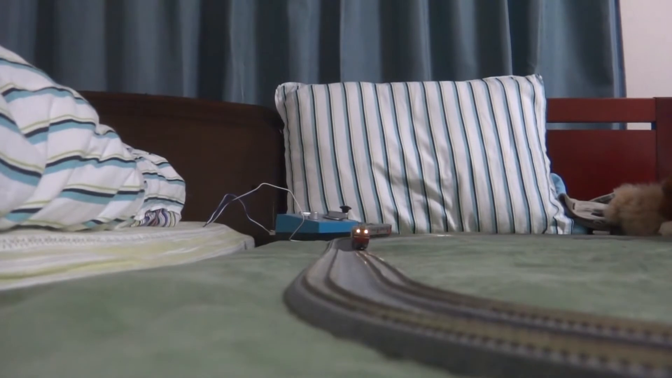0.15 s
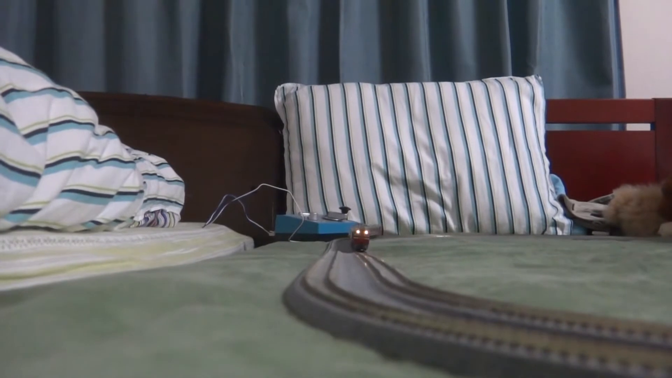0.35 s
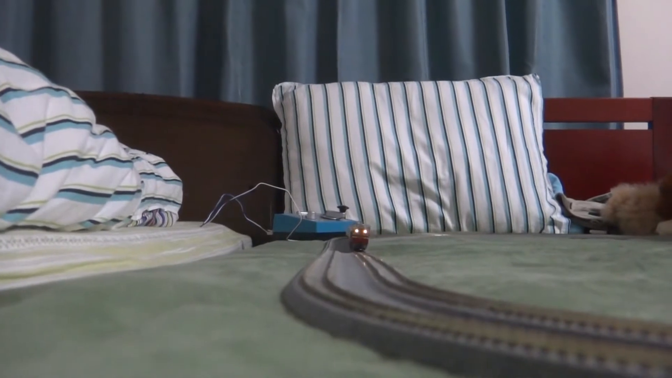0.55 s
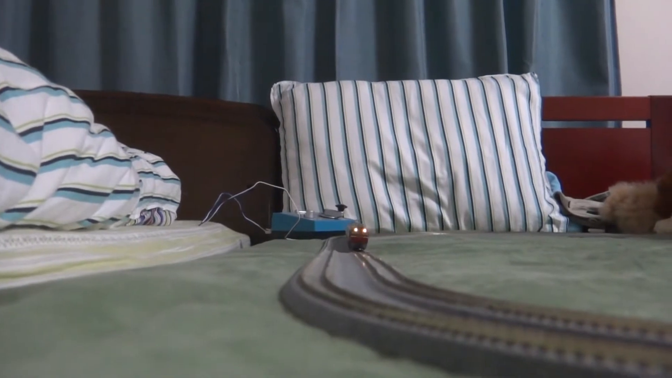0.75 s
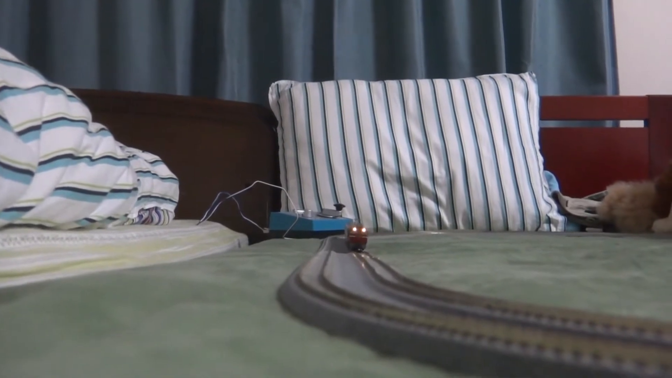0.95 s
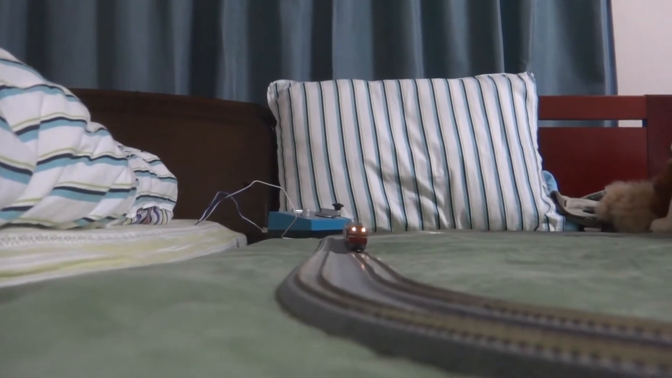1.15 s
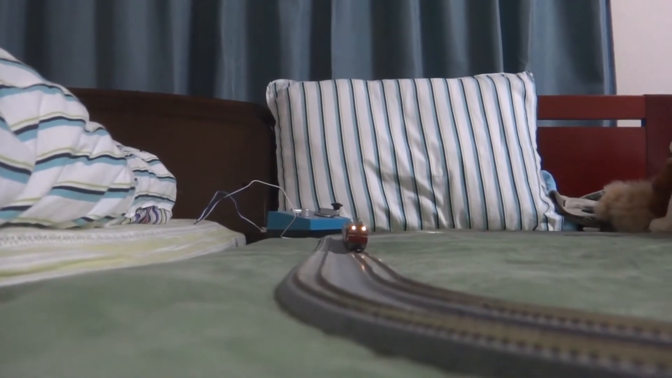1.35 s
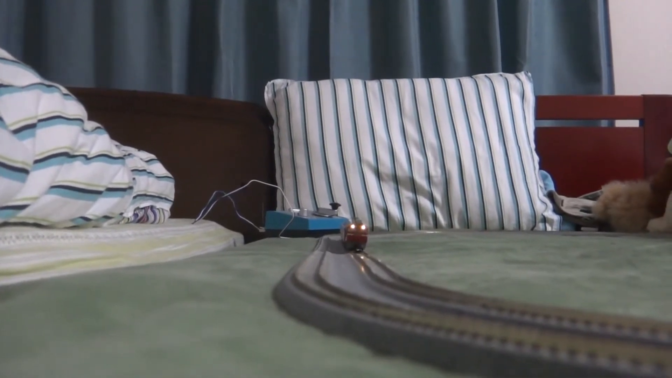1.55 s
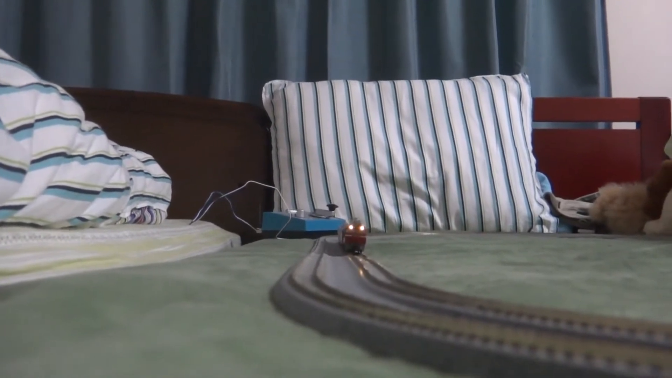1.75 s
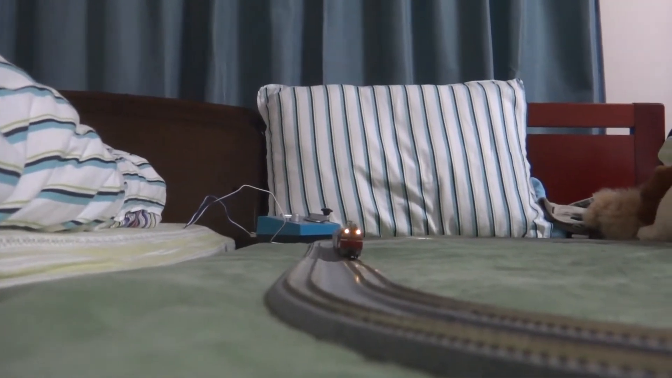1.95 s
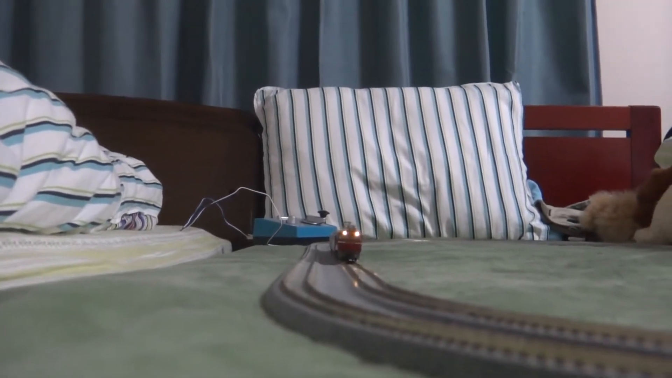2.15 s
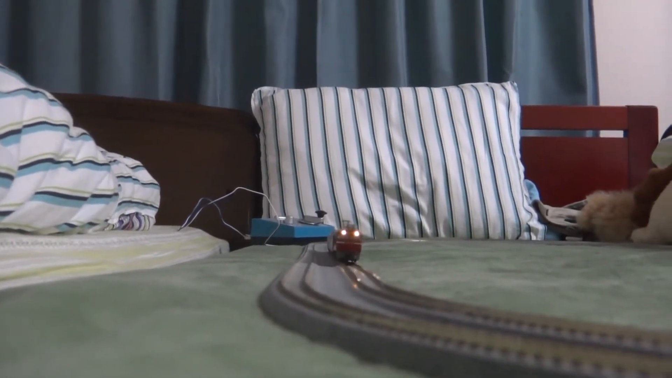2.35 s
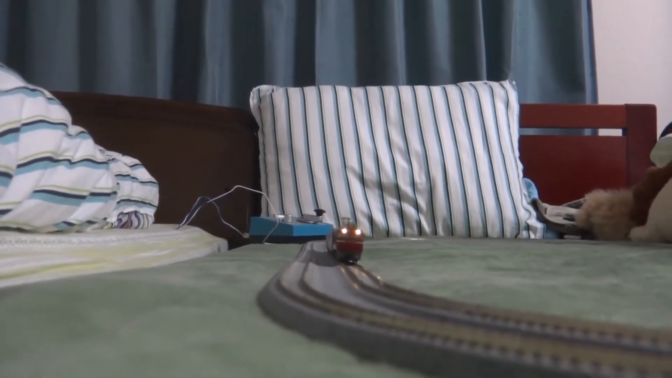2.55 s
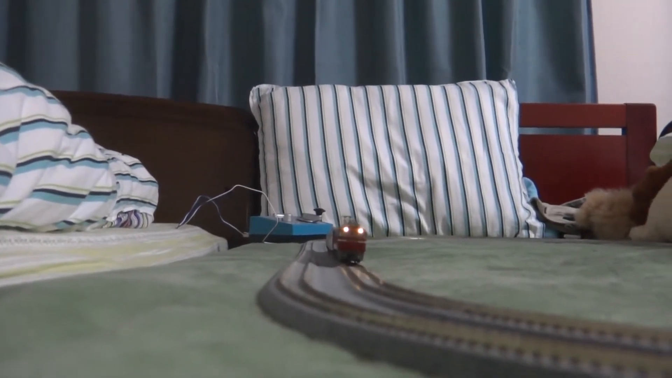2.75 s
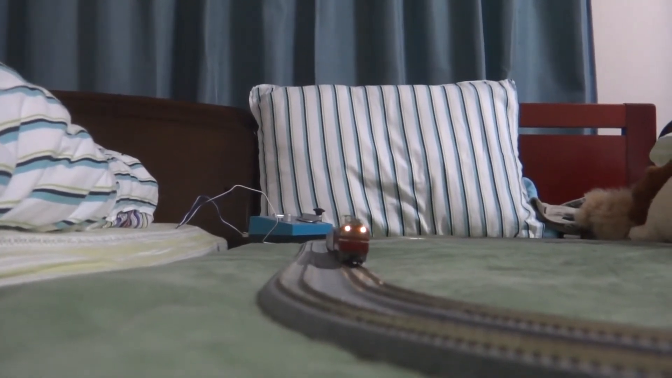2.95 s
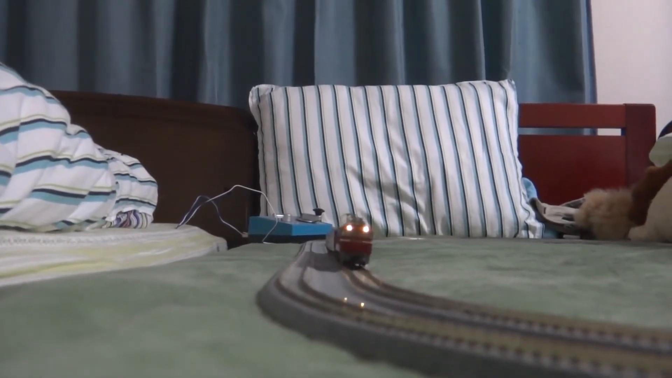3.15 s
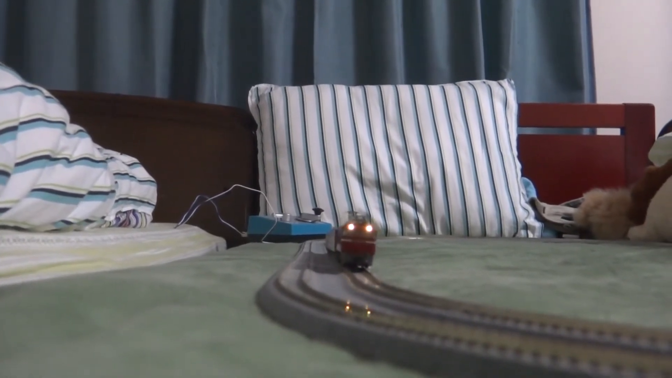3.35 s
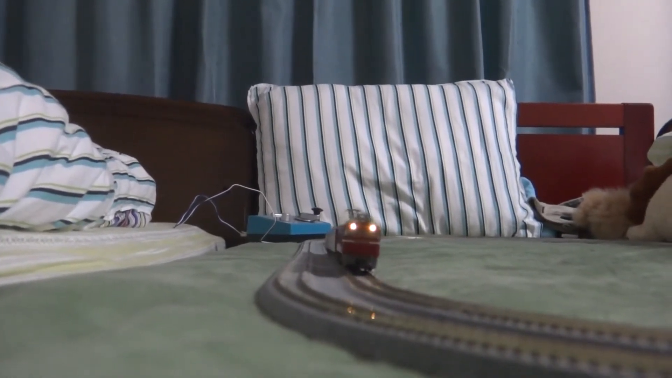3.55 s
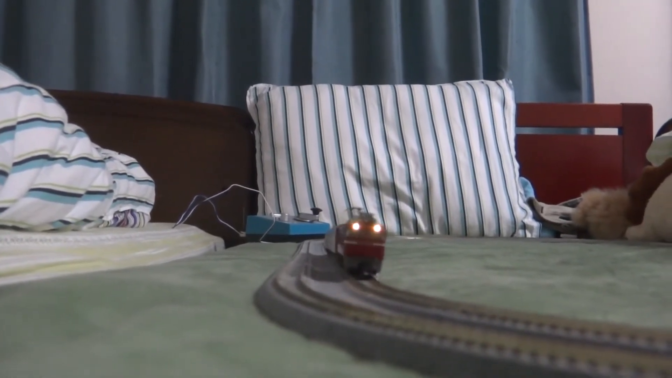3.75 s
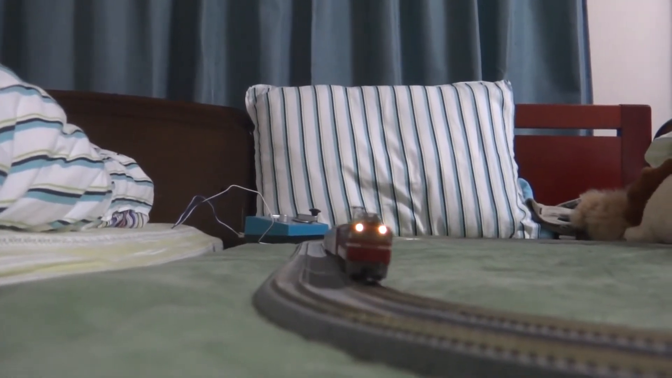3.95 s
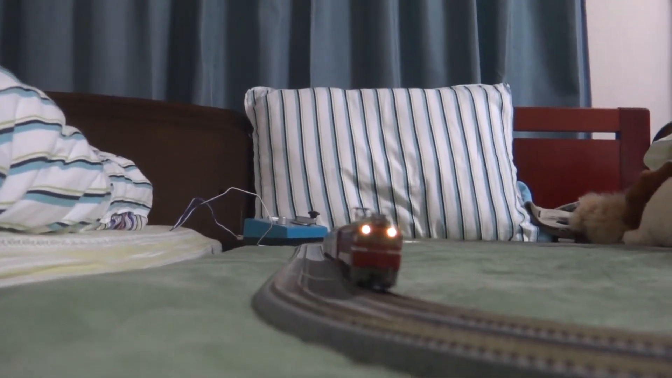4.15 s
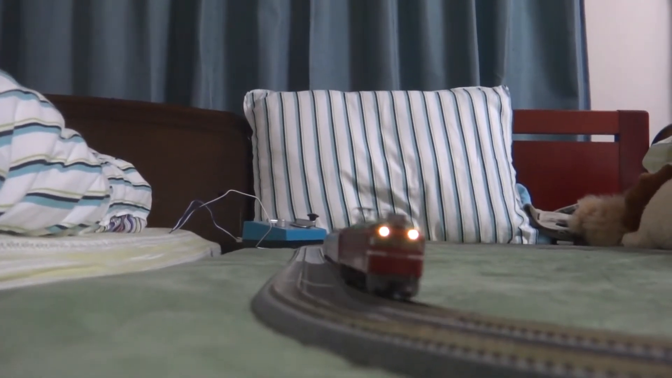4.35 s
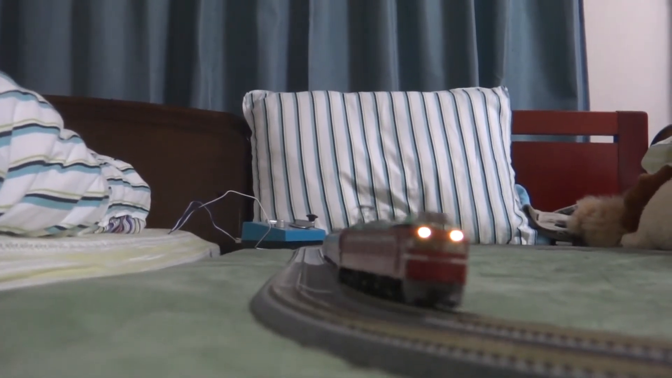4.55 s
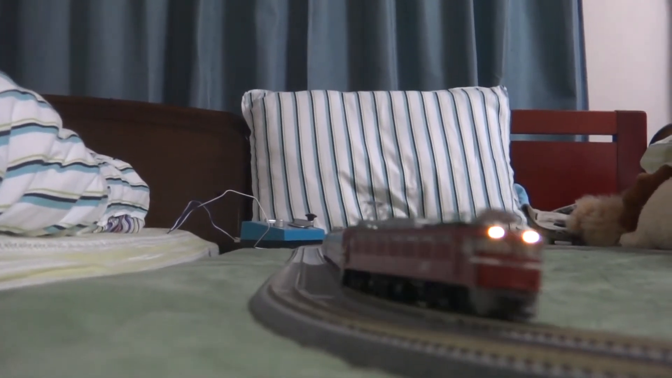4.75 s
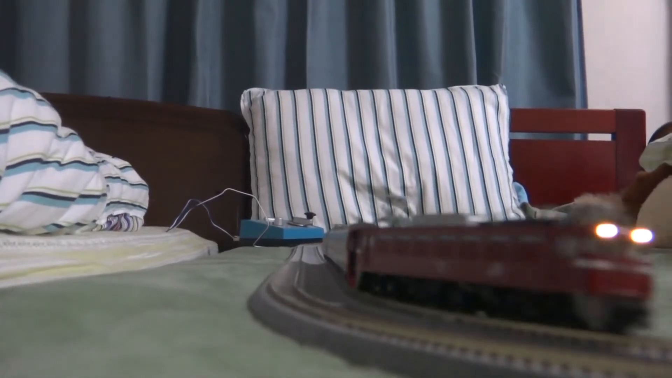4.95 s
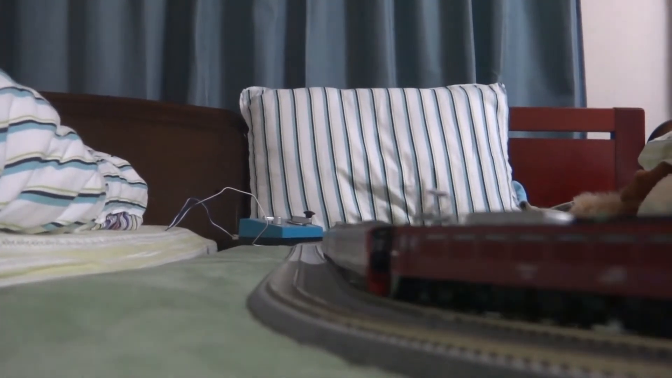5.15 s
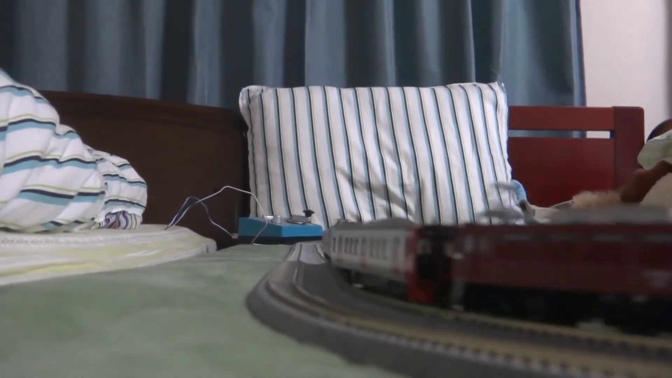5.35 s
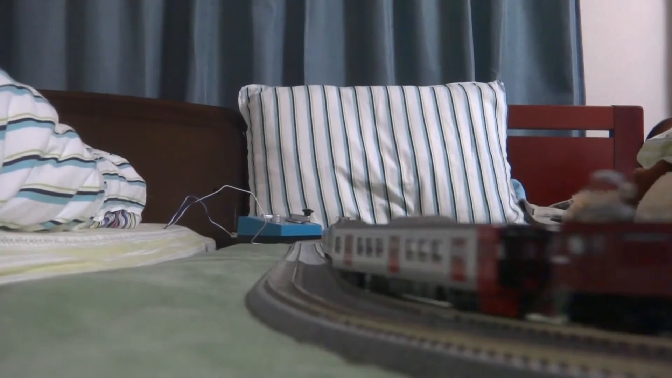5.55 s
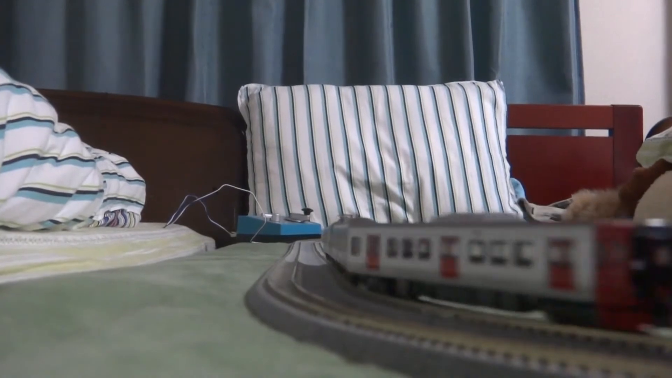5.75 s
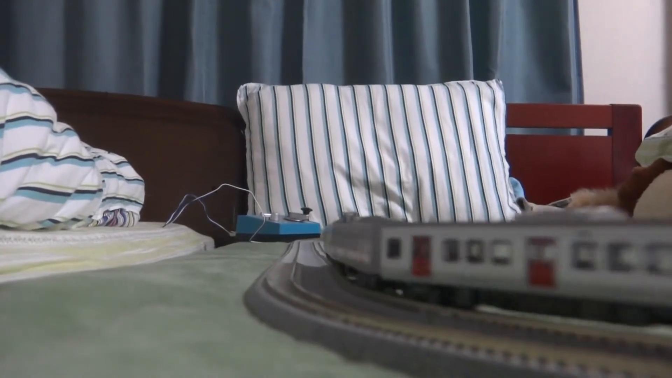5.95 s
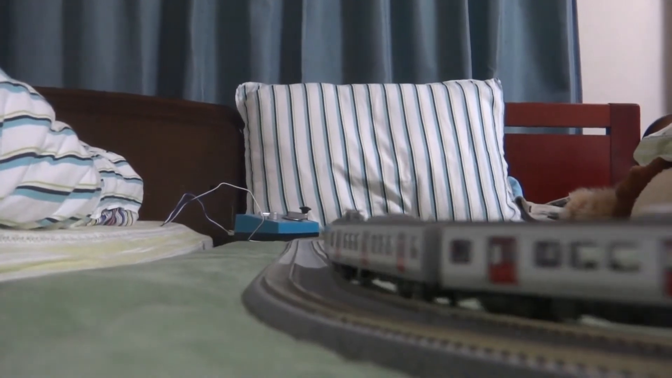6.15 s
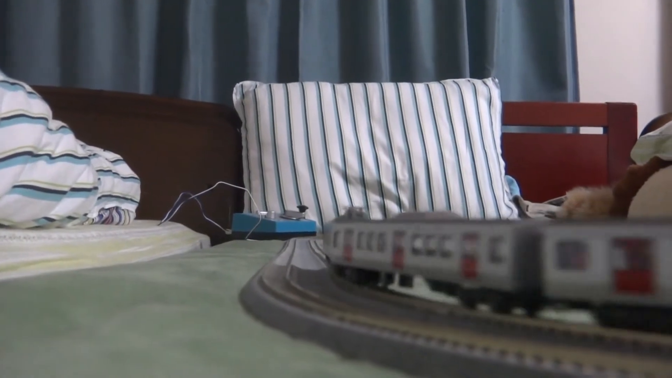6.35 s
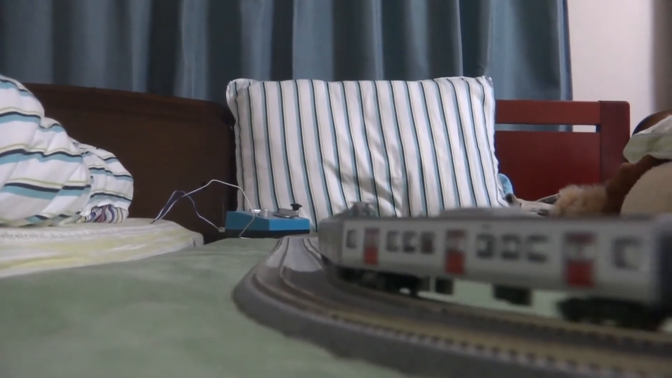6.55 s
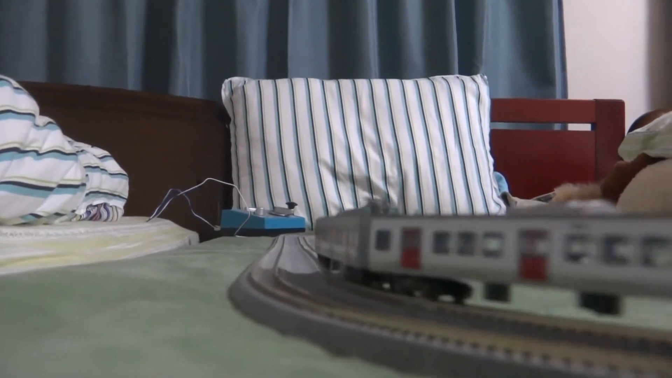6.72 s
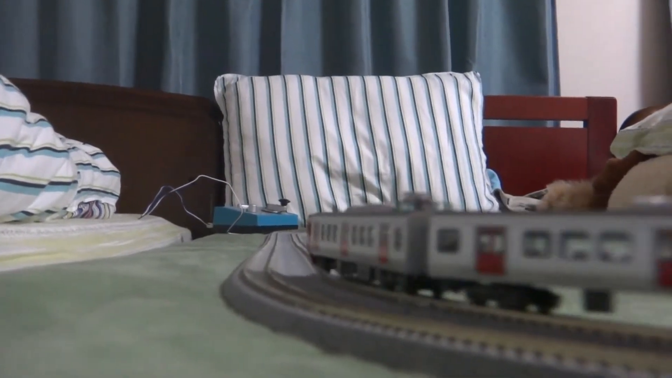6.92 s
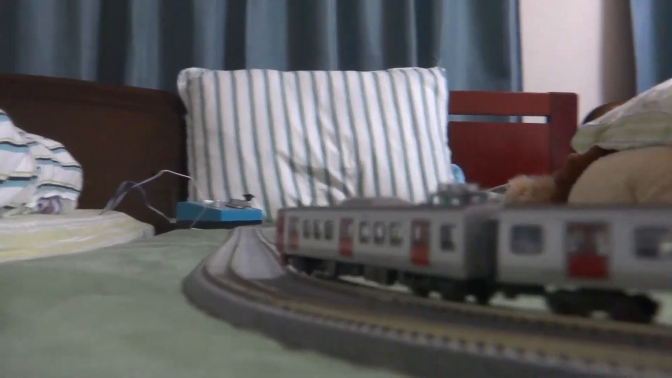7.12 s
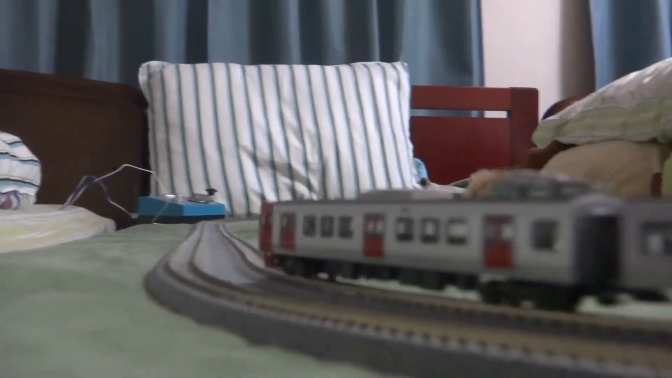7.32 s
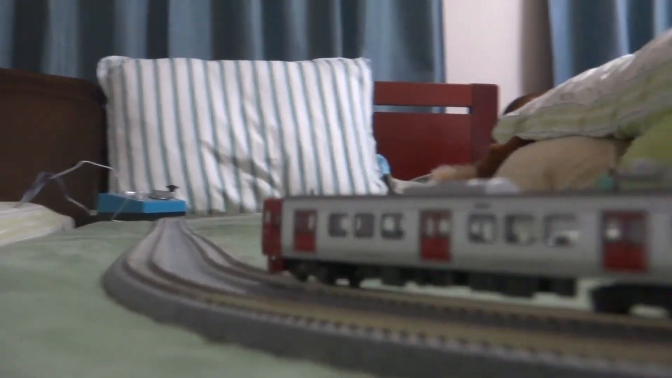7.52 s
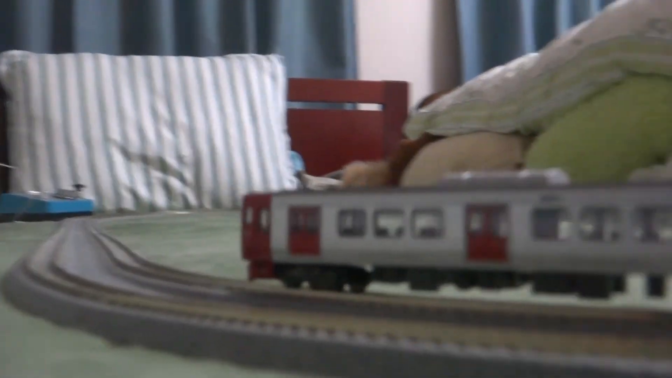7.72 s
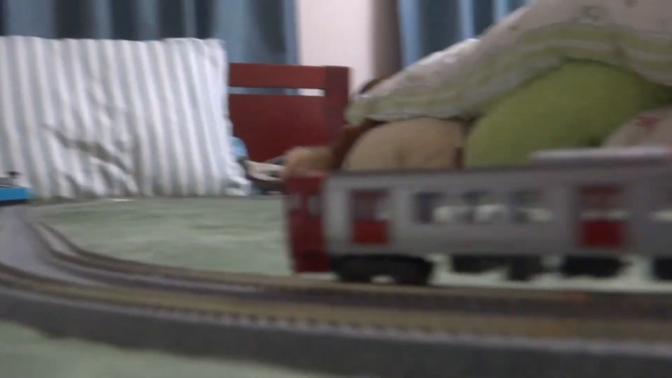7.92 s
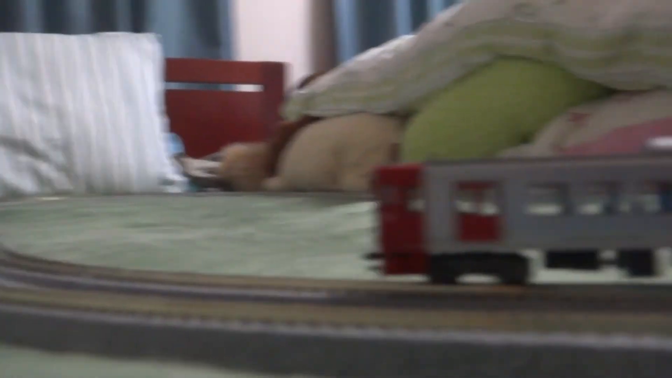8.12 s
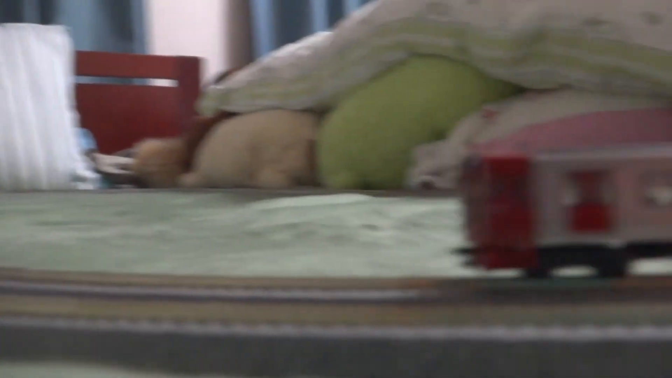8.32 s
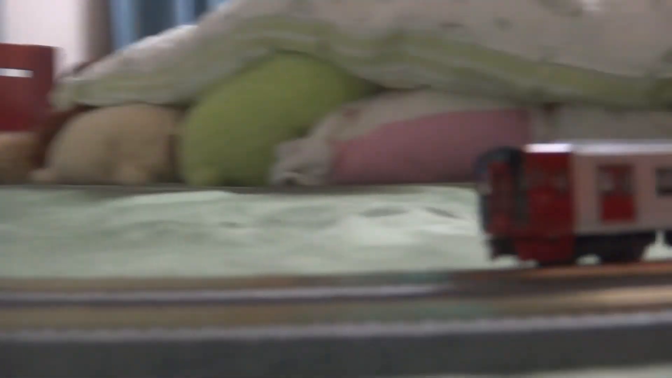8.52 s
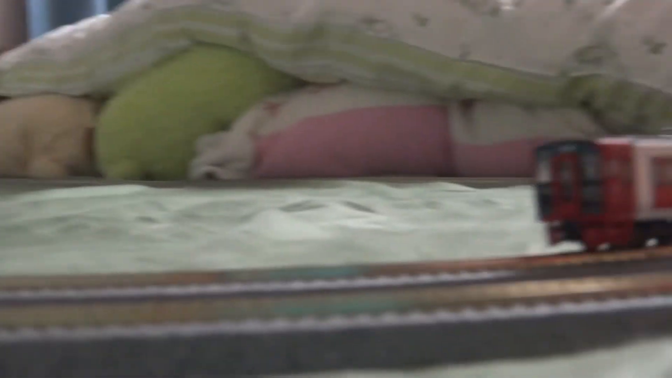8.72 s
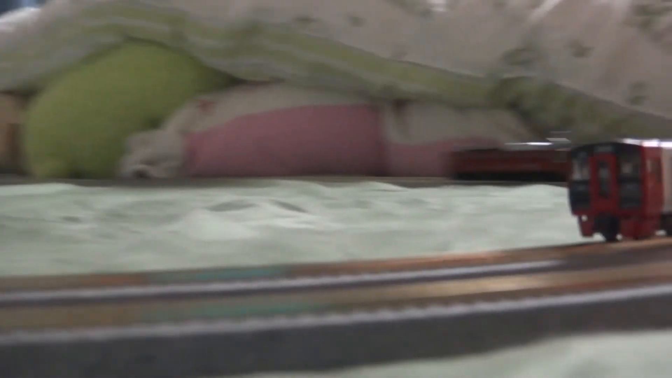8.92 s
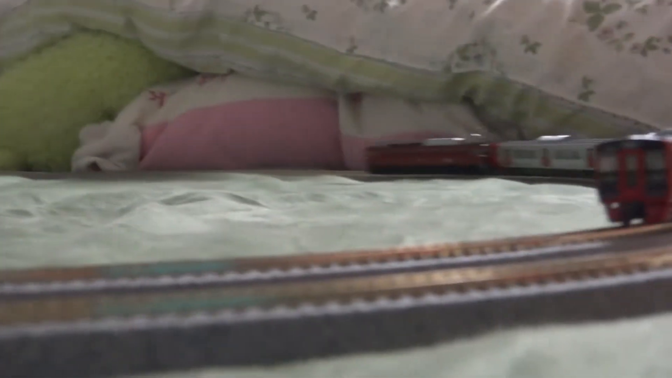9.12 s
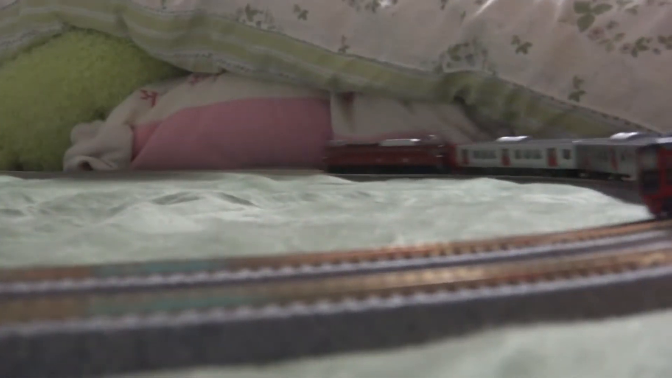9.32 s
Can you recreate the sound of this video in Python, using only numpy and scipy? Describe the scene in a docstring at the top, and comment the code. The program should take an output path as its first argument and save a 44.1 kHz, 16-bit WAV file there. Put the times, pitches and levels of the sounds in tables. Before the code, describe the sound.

The whirr of a model train grows from faint to close, then its coaches roll past with a gritty hiss and small ticks.

```python
"""Model train passing close by

Indoors, a hand-held camera faces plastic track laid over a bed; a small train comes head-on and rolls
past on the right. The engine's brushes whirr in step with its motor, a powered coach hums by, and the
wheels hiss and tick over a rail joint. Right at the microphone, fingers rub the camera's shell.
Behind it all lie quiet room hiss and a low drone; bedding and curtains leave no audible echo."""
import sys
import numpy as np
from scipy import signal
from scipy.fft import rfft, irfft, next_fast_len
from scipy.io import wavfile
from scipy.ndimage import uniform_filter1d, map_coordinates

SR = 44100
rng = np.random.default_rng(int(sys.argv[2]) if len(sys.argv) > 2 else 0)


def pcm_store(signal):
    """Save signal as 16-bit PCM."""
    levels = np.round(np.clip(np.atleast_2d(signal), -1, 1) * 32767)
    wavfile.write(sys.argv[1], SR, levels.astype(np.int16).T)


N = 413658

# Engine whirr at the microphone, nearing and passing: (time [s], level [dB])
ENGINE_LEVEL = [(0.0, -53), (1.1, -51), (2.8, -44), (4.2, -36.5), (5.04, -32.5), (5.64, -27.5),
                (6.1, -28.5), (6.8, -35), (7.5, -43), (8.2, -44), (8.7, -40.5), (9.38, -45)]
# Speed of the engine's motor: (time [s], shaft rate [Hz])
ENGINE_SPEED = [(0, 135.2), (.8, 134.4), (1.05, 131), (1.45, 126.6), (1.8, 124.7), (2.05, 123.9),
                (2.35, 122), (2.58, 123.5), (2.8, 120.2), (3.0, 119.5), (3.2, 120.5), (3.3, 118.9),
                (3.5, 120.5), (3.8, 121.3), (4.1, 123.9), (4.4, 122.5), (4.6, 124.2), (4.8, 122.8),
                (5.1, 125.3), (5.25, 127.2), (5.45, 127), (5.68, 126.7), (5.85, 127.9), (6.0, 128.9),
                (9.38, 130)]
# Throb of the brushes on the commutator: (multiple of shaft rate, depth [dB])
BRUSH_THROB = [(1, -25), (2, -14), (3, -18), (4, -18), (5, -24)]
# Whirr heard head-on, between the resonances: (frequency [Hz], level [dB])
FRONT_SPECTRUM = [(290, -66), (500, -12.5), (707, -7.5), (877, -21), (1300, -3), (2050, -4), (2630, -1),
                  (3400, -3.5), (4220, -22), (4700, -8.5), (5970, 1.5), (9340, 0.5), (10800, -0.5),
                  (11800, 3), (15700, 0)]
# Fixed resonant peaks colouring the engine's head-on whirr: (frequency [Hz], width [Hz], gain [dB])
FRONT_PEAKS = [(5150, 250, -7), (5865, 200, -4), (6300, 450, -2), (7040, 170, -3), (7500, 110, -3),
               (8580, 150, -4), (9300, 600, 0), (10550, 300, -3), (11800, 600, 1.5), (12700, 300, -1),
               (13100, 150, -2), (13800, 150, -9), (14300, 390, -7), (15200, 600, -3)]
# Whirr heard side-on: (frequency [Hz], level [dB])
FLANK_SPECTRUM = [(290, -55), (500, -38), (697, -12), (793, -27), (1150, -12), (1310, -23), (1830, 2.5),
                  (2030, -3.5), (3820, -4), (4230, -5), (5800, -5), (10300, -0.5), (11100, -6), (12800, 1),
                  (14000, 0.5), (15200, -10), (15700, 0)]
# Stereo image of the side-on whirr: (frequency [Hz], left-right likeness [0-1])
FLANK_LIKENESS = [(1000, 1), (7000, 1), (9000, 1), (10800, 0.57), (13000, 0.92), (14500, .99)]
# Rings that flare as the engine swings side-on: (frequency [Hz], width [Hz], gain [dB])
FLARE_BANDS = [(5800, 350, -3), (6400, 400, -3), (9350, 220, -1), (11850, 400, -6), (15250, 800, 1)]
# Whine of the engine's gears up close: (multiple of shaft rate, level against the whirr [dB])
GEAR_ORDERS = [(24, -23), (27, -18), (29, -22), (31, -23), (33, -23), (34, -24)]
# Rolling noise at the microphone: (time [s], level [dB], treble gain [dB])
ROLL_LEVEL = [(0.0, -53.5, 7), (0.75, -60, 9.5), (2.45, -53, -13), (3.76, -47, -22), (4.2, -42.5, 7),
              (5.1, -40, 5.5), (5.7, -30, 4.5), (6.0, -28, 1), (6.9, -25.5, 0.5), (7.7, -25.5, -3.5),
              (8.1, -27.5, -3.5), (8.55, -28, -2), (8.83, -31, 0), (9.1, -32.5, 1), (9.38, -34, 2.5)]
# Wheels on the track: (frequency [Hz], level [dB])
ROLL_SPECTRUM = [(15, -72), (25, -42.5), (291, -17.5), (370, -13), (402, -17.5), (526, -14), (670, -16),
                 (901, -9.5), (1000, -9.5), (1280, -4.5), (2720, -1), (3470, -1.5), (4800, 0), (6300, -1),
                 (7000, -1), (9410, -4.5), (11000, -12), (15700, -24)]
# Stereo image of the rolling: (frequency [Hz], left-right likeness [0-1])
ROLL_LIKENESS = [(60, 0.96), (120, 1), (240, 0.72), (480, 0.76), (950, 0.96), (1890, 0.87), (3770, 0.99),
                 (5500, 1), (8000, 0.99), (11000, 0.87), (14000, 0.97)]
# The camera shades one microphone port from the near coaches: (frequency [Hz], left over right [dB])
CAMERA_SHADOW = [(60, 0.0), (130, 2), (290, -0.5), (640, -0.5), (1410, 0), (3100, -3), (6820, -1),
                 (15000, -1.5)]
# Wheel sets ringing as they go by: (time [s], swell [dB])
BOGIE_SWELLS = [(5.3, 1), (6.02, 3), (6.34, 3.5), (6.56, 5.5), (6.83, 4.5), (7.1, 3.5), (7.32, 4.5),
                (7.601, 5), (8.23, -1), (8.392, 2), (8.78, 0)]
# Hum of the powered coach at the microphone: (time [s], level [dB])
COACH_LEVEL = [(0, -73.5), (3.6, -70.5), (4.4, -82), (5.2, -70), (6, -45.5), (6.35, -39), (6.75, -41),
               (7.05, -48.5), (7.5, -69)]
# Speed of the coach's motor: (time [s], shaft rate [Hz])
COACH_SPEED = [(0.3, 130.1), (0.8, 125.4), (1.8, 120.0), (2.4, 117.2), (3.3, 115.5), (4.2, 117.0),
               (5.6, 121.9), (6.0, 124), (6.45, 126), (6.85, 126.7), (7.15, 124.6)]
# Tones of the coach's drive: (multiple of shaft rate, level [dB])
COACH_ORDERS = [(2, -24.5), (3, -2), (10, -20), (12, -10), (14, -6.5), (15, -3.5), (16, -7), (17, -14)]
# Wheels on the joint, with a few small rattles among them: (time [s], rail peak [dB], wheel ring [Hz], rail end
# against that peak [dB])
TRACK_TICKS = [(4.0645, -19, 2900, -5), (4.0761, -22, 5070, -6), (4.148, -24, 3600, -3),
               (4.155, -28, 6000, -6), (4.1597, -20, 3760, -2), (4.1599, -13, 3860, 3),
               (4.1724, -12, 7800, 2), (4.178, -23, 6200, -7), (4.3014, -10.5, 7900, -9),
               (4.308, -18, 6500, -4), (4.4056, -9, 6100, -1), (4.5347, -9.5, 5170, -1),
               (4.6354, -10, 7840, -2), (4.838, -12, 6740, 2), (4.9186, -8.5, 8450, -1),
               (5.3744, -6.5, 5500, -5), (5.4538, -9, 7800, -2), (5.5143, -13, 5750, 1),
               (5.7038, -10, 8000, -2), (6.143, -10, 7500, -3), (6.2216, -10.5, 8510, 0),
               (6.4652, -10, 7600, -1), (6.547, -15, 4200, -12), (6.812, -17, 3500, -12),
               (6.845, -16, 7600, -6), (6.8934, -8.5, 5960, -0.5), (6.916, -17, 7500, -8),
               (6.9706, -9, 2200, -4), (6.98, -14, 7000, -6), (7.008, -11, 2900, -16),
               (7.094, -16, 5000, -12), (7.105, -12, 5500, -14), (7.248, -16, 6000, -10),
               (7.6054, -12, 5560, -12), (8.0203, -11.5, 6800, -20), (8.078, -13, 3730, -17),
               (8.1, -9, 6400, -19), (8.154, -20, 8000, -9), (8.1794, -17, 5840, -14),
               (8.27, -10, 6130, -16), (8.279, -22, 7000, -10), (8.3484, -12.5, 8100, -21),
               (8.377, -20, 8500, -17), (8.675, -19, 7000, -9), (8.775, -17, 8040, -6),
               (8.7936, -11.5, 8300, -14), (8.836, -18, 8600, -9), (8.873, -10, 8100, -7),
               (9.18, -19, 7630, -10), (9.325, -23, 4460, -12), (9.358, -20, 5820, -2)]
# Resonances of bed, track, rail and rail end, a list each: (frequency [Hz], width [Hz], gain [dB])
JOINT_MODES = [
    [(300, 500, 0)],
    [(1900, 1600, 0)],
    [(3100, 1200, -8), (4300, 1000, -5), (5500, 1200, -4), (7400, 1500, -1), (8900, 1400, -2)],
    [(10400, 1800, 0), (12900, 2000, 2), (14800, 2000, -4)],
]
# Wheels ringing on after the engine's hardest landing: (time [s], frequency [Hz], level [dB])
WHEEL_CLANGS = [(4.1600, 4000, -18), (4.1600, 10500, -17), (4.1604, 7600, -19), (4.1603, 12700, -22),
                (4.1614, 5200, -18), (4.1615, 1500, -27)]
# Finger strokes on the camera: (start [s], swell [s], fade [s], top level [dB])
FINGER_STROKES = [(7.05, 0.12, 0.11, -38.5), (7.35, 0.069, 0.039, -41), (7.5, 0.06, 0.42, -32),
                  (7.75, 0.33, 0.083, -70), (8.05, 0.22, 0.17, -37), (8.33, 0.061, 0.14, -40.5),
                  (8.43, 0.085, 0.037, -31.5), (8.56, 0.056, 0.13, -39), (8.89, 0.025, 0.23, -39)]
# Skin slipping on the shell: (frequency [Hz], level [dB])
RUB_SPECTRUM = [(150, -56), (250, -34), (440, -12.5), (540, -4), (670, -2.5), (762, -3.5), (954, 2),
                (1300, -0.5), (1700, -4), (2210, -12), (3200, -3), (4500, -60)]
# Paths through the shell to the two ports: (frequency [Hz], left over right [dB], left lead [rad])
PORT_PATHS = [(300, -4, .4), (474, -13, -1.7), (560, 3, -1.4), (650, 16, .2), (820, 8, .9), (1000, 3, .9),
              (1160, 0, 1.3), (1300, 4, 1.1), (1600, 0, 0)]
# Soft taps on the camera: (time [s], level [dB], pitch [Hz], 60 dB decay [s])
FINGER_TAPS = [(1.329, -51, 480, 0.1), (1.405, -41.5, 524, 0.051), (1.657, -45, 1120, 0.046),
               (1.829, -48, 259, 0.078)]
# Room tone and microphone hiss: (frequency [Hz], level [dB])
ROOM_SPECTRUM = [(12, -49), (20, -19), (123, -7), (316, -5), (385, -3), (913, -0.5), (1350, 3),
                 (1730, -3.5), (2630, -0.5), (3580, -11.5), (6080, -8), (8990, -16), (15700, -10.5)]
# Background hiss, nearly mono in the top treble: (frequency [Hz], left-right likeness [0-1])
HISS_LIKENESS = [(60, 1), (180, 0.57), (550, 0.18), (1650, 0.51), (4970, 0.92), (11000, 0.35), (14000, 1)]
# Low drone in the room: (time [s], level [dB])
DRONE_LEVEL = [(0, -83), (1, -80), (1.6, -75), (3.7, -76.5), (4.2, -70), (4.9, -71), (5.6, -82), (6.6, -71),
               (7.4, -76.5), (8.2, -72), (9.38, -78)]
# Notches of the microphone grille: (frequency [Hz], width [Hz], gain [dB])
GRILLE_NOTCHES = [(6800, 150, -4), (12280, 150, -4), (13520, 220, -6), (13950, 160, -6), (14750, 300, -8)]

TIME = np.arange(N) / SR
PASS_PAN_DB = -3.5  # change in left over right as the wheels go by


def engine():
    """Brush noise throbs with the commutator, heard head-on with resonant peaks, then side-on."""
    level_db, = curves(ENGINE_LEVEL)
    side_on, = curves([(4.4, 0), (5.42, 1)])
    angle = 2 * np.pi * np.cumsum(curves(ENGINE_SPEED)[0] + .5 * wobble(9)) / SR
    throb = np.exp(sum(amp(db) * np.cos(k * angle + wobble(3.67)) for k, db in BRUSH_THROB))
    drive = throb * amp(0.63 * wobble(300)) * brushes(angle)
    peak_power = lambda hz: sum(amp(db) ** 2 * band(hz, c, w) for c, w, db in FRONT_PEAKS)
    front_colour = lambda hz: np.sqrt(amp(along(FRONT_SPECTRUM, hz) - 1.5) ** 2 + peak_power(hz))
    front = rush(front_colour, [(1000, 0.8), (3000, 1), (7000, 1)], drive, patchy_db=0, streaky_db=1.4)
    flank = rush(spectrum(FLANK_SPECTRUM), FLANK_LIKENESS, drive, patchy_db=0.5, streaky_db=2)
    whirr = np.sqrt(1 - side_on) * front + np.sqrt(side_on) * flank
    flare = filtered(whirr, lambda hz: sum(amp(db) * band(hz, c, w) for c, w, db in FLARE_BANDS))
    whirr += swell(at_s=5.12, spread_s=0.32) * flare
    whine = sum(amp(db + 3 * wobble(8)) * np.sin(k * angle) for k, db in GEAR_ORDERS)
    whirr += swell(at_s=5.45, spread_s=0.28) * whine
    hum = amp(-39) * np.sin(3 * angle) + amp(-46.5) * np.sin(angle)  # three poles and the shaft
    return panned(amp(level_db + 0.16 * wobble(9.5)) * (whirr + hum), -0.5 * passing())


def brushes(angle):
    """The brushes ride the same rough commutator every turn, so part of their treble repeats."""
    wear_s, repeat_mix, repeat_above_hz = .4, .35, 3500  # the pattern renews itself over wear_s
    rows = int(N / SR / wear_s) + 2
    surface = irfft(np.exp(2j * np.pi * rng.random((rows, 130))), 4096)  # one turn a row
    surface = np.hstack([surface, surface[:, :1]])
    contact = [TIME / wear_s, angle / (2 * np.pi) % 1 * 4096]
    repeating = unit(map_coordinates(surface, contact, order=1))
    mid, side = rng.standard_normal((2, N))
    share = lambda hz: repeat_mix * treble(hz, repeat_above_hz)
    parts = filtered(np.array([mid, repeating]), lambda hz: np.sqrt([1 - share(hz), .73 * share(hz)]))
    return np.array([parts.sum(axis=0), side])


def wheels():
    """Gritty rolling contact: wheel sets ring in passing; the hiss brightens and dulls over time."""
    rattles_per_s, rattle_size, rattle_decay_s = 40, 1.1, .0012  # loose couplings and axles
    level_db, sheen_db = curves(ROLL_LEVEL)
    bogie_db = -0.5 + sum(db * swell(s, spread_s=0.048) for s, db in BOGIE_SWELLS)
    grit = amp(0.93 * wobble(500) + 0.49 * wobble(80) + 0.3 * wobble(15))
    jolts = (rng.random(N) < rattles_per_s / SR) * rng.random(N) * rattle_size
    rattle = signal.lfilter([1], [1, -np.exp(-1 / (rattle_decay_s * SR))], jolts)
    drive = grit * (1 + rattle) * rng.standard_normal((2, N))
    roll = rush(spectrum(ROLL_SPECTRUM), ROLL_LIKENESS, drive, patchy_db=1, streaky_db=1.5)
    roll = filtered(roll, lambda hz: panned(0.9, along(CAMERA_SHADOW, hz)))
    sheen = filtered(roll, lambda hz: treble(hz, above_hz=6500))
    ring = filtered(roll, lambda hz: band(hz, centre_hz=4900, width_hz=760))
    rolling = roll + (amp(sheen_db) - 1) * sheen + (amp(bogie_db) - 1) * ring
    return panned(amp(level_db) * rolling, PASS_PAN_DB * (passing() - .6))


def coach():
    """The coach's motor hums at multiples of its shaft rate, shaken by backlash; its gear case rasps."""
    level_db, = curves(COACH_LEVEL)
    angle = 2 * np.pi * np.cumsum(curves(COACH_SPEED)[0]) / SR
    tones = sum(amp(db + 0.24 * k * wobble(13)) * np.sin(k * angle + 0.044 * k * wobble(45))
                for k, db in COACH_ORDERS)
    sixth_db = -64 + 0.41 * (level_db - level_db.max())  # this order fades less with distance
    sixth = amp(sixth_db + 1.8 * wobble(11)) * np.sin(6 * angle + 0.78 * wobble(33))
    rasp = amp(-6.5) * narrow_noise(centre_hz=1920, width_hz=260)
    hum = np.sqrt(2) * (amp(level_db) * (tones + rasp) + sixth)
    sounding = TIME < COACH_LEVEL[-1][0]
    return panned(hum * sounding, np.array([-.5]))


def rail_joint():
    """Each wheel drops on the joint, and loose parts rattle in between: blow and chatter thud the bed, knock
    the track and ring the metal."""
    chatter_t60_s, thud_db, knock_db, crack_db = 0.006, -40, -21, -7
    out = np.zeros(N + SR)
    t, hz = np.arange(2048) / SR, np.fft.rfftfreq(2048, 1 / SR)
    bed, track, rail, rail_end = (modes(part, hz) for part in JOINT_MODES)
    for s, db, wheel_hz, end_db in TRACK_TICKS:
        blow = rng.standard_normal(len(t)) * strike(t, chatter_t60_s, rise_s=chatter_t60_s / 30)
        blow[6] += 11  # first contact stands out of the chatter
        wheel = modes([(wheel_hz, 1000, 0)], hz)
        paths = np.array([bed, track ** 2, rail + wheel, rail_end ** 2])  # squared for steeper sides
        parts = irfft(rfft(blow) * paths)
        parts /= np.abs(parts).max(axis=1, keepdims=True)
        crack = np.diff(blow, prepend=0) / np.abs(np.diff(blow)).max()  # the bare blow, heard directly
        tick = amp(db + np.array([thud_db, knock_db, 0, end_db])) @ parts
        tick += amp(db + crack_db + end_db / 2) * crack
        out[round((s + .0007) * SR):][:len(t)] += tick
    # The engine's hardest landing also jolts the bed and leaves wheels ringing.
    landing_s, jolt_db, landing_t60_s = 4.16, -28, .008
    shove = (1 + rng.standard_normal(len(t))) * amp(-60 * t / landing_t60_s)
    jolt = irfft(rfft(shove) * modes([(500, 1900, 0)], hz))
    out[round(landing_s * SR):][:len(t)] += amp(jolt_db) * jolt / np.abs(jolt).max()
    for s, clang_hz, db in WHEEL_CLANGS:
        clang = 2 * np.sin(2 * np.pi * clang_hz * t)
        out[round(s * SR):][:len(t)] += amp(db) * strike(t, landing_t60_s, rise_s=.0005) * clang
    return panned(out[:N], PASS_PAN_DB * passing())


def handling():
    """Skin slips on the camera's shell, reaching each port its own way; a few soft taps come earlier."""
    swing_db = 12.5  # gained over a stroke's swell, lost over its fade
    strokes = sum(amp(db - swing_db * np.maximum((s + rise - TIME) / rise, (TIME - s - rise) / fade))
                  for s, rise, fade, db in FINGER_STROKES)
    slips = amp(0.83 * wobble(90) + 1.2 * wobble(25)) * rng.standard_normal((2, N))
    likeness = [(500, 0.8), (900, 0.86), (1400, 0.47)]
    rub = rush(spectrum(RUB_SPECTRUM), likeness, slips, patchy_db=-1.5, streaky_db=1.5)
    port_hz, pan_db, lead_rad = np.transpose(PORT_PATHS)
    log_ratio = np.log(amp(pan_db)) + 1j * lead_rad  # left over right, half to each port
    to_ports = lambda hz: np.exp(np.outer([.5, -.5], np.interp(hz, port_hz, log_ratio)))
    out = strokes * unit(filtered(rub, to_ports))
    t = np.arange(SR // 5) / SR
    for s, db, hz, t60_s in FINGER_TAPS:
        phase = 2 * np.pi * hz * t
        thud = np.sin(phase) + 0.33 * np.sin(0.36 * phase) + 0.45 * np.sin(2.5 * phase)
        out[:, round(s * SR):][:, :len(t)] += amp(db) * strike(t, t60_s, rise_s=0.0035) * thud
    return out


def room():
    """Quiet room tone and microphone hiss, with a narrow low drone that wavers."""
    noise = rng.standard_normal((2, N))
    hiss = rush(spectrum(ROOM_SPECTRUM), HISS_LIKENESS, noise, patchy_db=1.5, streaky_db=1.5)
    drone = narrow_noise(centre_hz=125.8, width_hz=8.4)
    drone_db = curves(DRONE_LEVEL)[0] + 1.5 * wobble(1.17)
    return amp(-53) * hiss + amp(drone_db) * drone


def passing(at_s=5.36, spread_s=0.18):
    """0 while the train is ahead of the microphone, 1 once it runs on the right."""
    return .5 + .5 * np.tanh((TIME - at_s) / spread_s)


def rush(colour, likeness, drive, patchy_db, streaky_db):
    """Stereo noise of rms 1 from a mid and side drive, with broad patches and narrow streaks of gain."""
    bins = signal.stft(drive, nperseg=2048)[2]
    hz = np.fft.rfftfreq(2048, 1 / SR)
    broad = patches(bins.shape[1:], bins=24, frames=3)
    narrow = patches(bins.shape[1:], bins=3, frames=16)
    spread = np.arccos(np.clip(along(likeness, hz), -1, 1)) / 2
    gains = colour(hz) * [np.cos(spread), np.sin(spread)]
    bins = bins * amp(patchy_db * broad + streaky_db * narrow) * gains[..., None]
    mid, side = signal.istft(bins, nperseg=2048)[1][:, :N]
    return unit(np.array([mid + side, mid - side]))


def patches(shape, bins, frames):
    """A random field of rms 1, smooth over some bins and frames."""
    field = uniform_filter1d(rng.standard_normal(shape), bins, axis=0)
    return unit(uniform_filter1d(field, frames, axis=1))


def narrow_noise(centre_hz, width_hz):
    """Noise of rms 1, passed twice through one resonance."""
    return unit(filtered(rng.standard_normal(N), lambda hz: modes([(centre_hz, width_hz, 0)], hz) ** 2))


def wobble(rate):
    """A smooth random curve, rate knots a second."""
    steps = np.arange(0, N + 16, 16)
    knots = rng.standard_normal(int(N * rate / SR) + 4)
    return np.interp(np.arange(N), steps, map_coordinates(knots, [steps * rate / SR]))


def swell(at_s, spread_s):
    """A bell curve in time, 1 at its top."""
    return np.exp(-((TIME - at_s) / spread_s) ** 2 / 2)


def strike(t, t60_s, rise_s):
    """Envelope of an impact: quick rise, exponential decay."""
    return amp(-60 * t / t60_s) * (1 - np.exp(-t / rise_s))


def curves(rows):
    """One value per sample for each column after the time."""
    times, *columns = np.transpose(rows)
    return [np.interp(TIME, times, column) for column in columns]


def along(points, hz):
    """(Hz, value) points joined on a log axis."""
    point_hz, values = np.transpose(points)
    return np.interp(np.log(hz + 1), np.log(point_hz + 1), values)


def spectrum(points):
    """Gain as a function of frequency, from (Hz, dB) points."""
    return lambda hz: amp(along(points, hz))


def modes(table, hz):
    """Causal response of (Hz, width, dB) resonances."""
    return sum((-1) ** k * amp(db) * 1j * hz * w / (c * c - hz * hz + 1j * hz * w)
               for k, (c, w, db) in enumerate(table))


def band(hz, centre_hz, width_hz, steepness=4):
    """1 at the centre, half at the edges."""
    return 1 / (1 + (2 * (hz - centre_hz) / width_hz) ** steepness)


def treble(hz, above_hz):
    """A steep high-pass curve."""
    return 1 / (1 + (above_hz / (hz + 1)) ** 6)


def filtered(x, response):
    """x through a complex response of frequency."""
    size = next_fast_len(N + SR // 2)
    return irfft(rfft(x, size) * response(np.fft.rfftfreq(size, 1 / SR)), size)[..., :N]


def panned(x, pan_db):
    """Half of the left-over-right level on each side."""
    return x * amp(np.array([pan_db / 2, -pan_db / 2]))


def amp(db):
    """Gain of a level in dB."""
    return 10 ** (np.asarray(db) / 20)


def unit(x):
    """x at rms 1."""
    return x / np.sqrt(np.mean(x ** 2) + 1e-20)


def scene():
    """Train, hand and room as they reach the microphone, without echo."""
    return engine() + wheels() + coach() + rail_joint() + handling() + room()


def record(dry):
    """The microphone's grille notches the treble; nothing is kept above the band limit."""
    top_hz = 15750
    grille = lambda hz: amp(sum(db * band(hz, c, w, steepness=2) for c, w, db in GRILLE_NOTCHES))
    return filtered(dry, lambda hz: grille(hz) * (hz < top_hz))


dry = scene()
out = record(dry)
pcm_store(out)
```